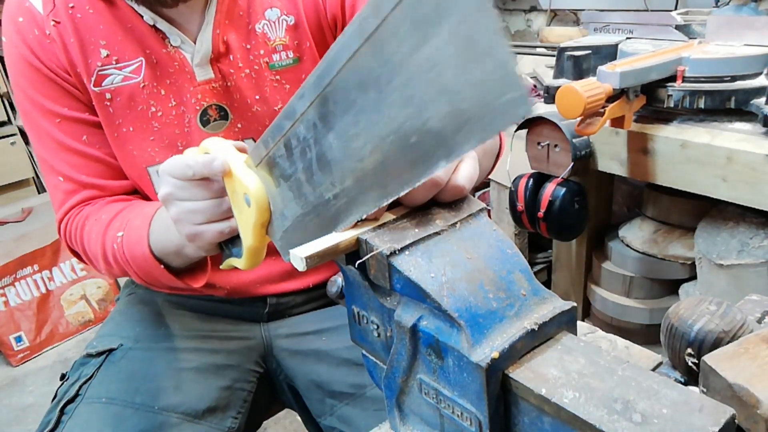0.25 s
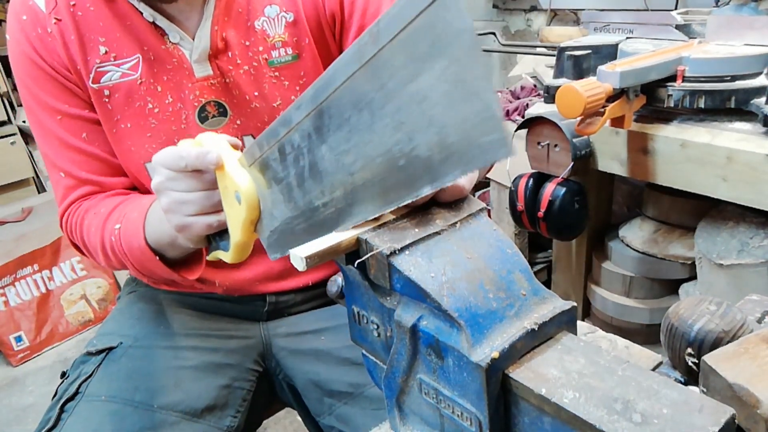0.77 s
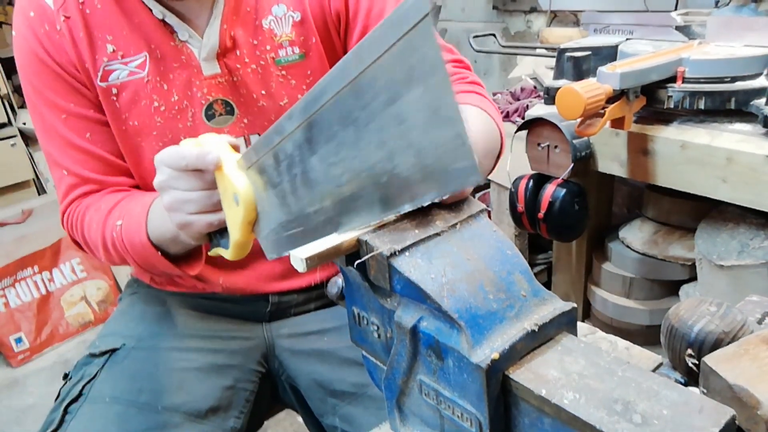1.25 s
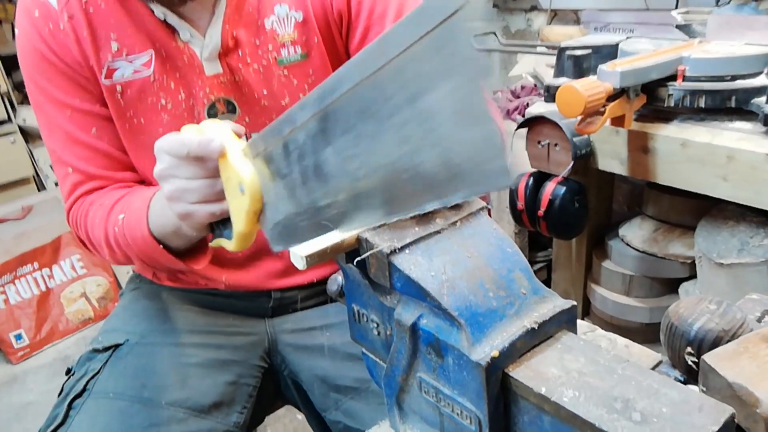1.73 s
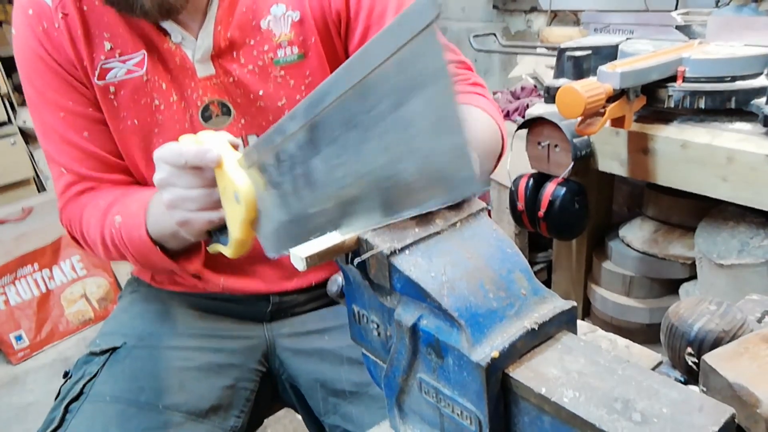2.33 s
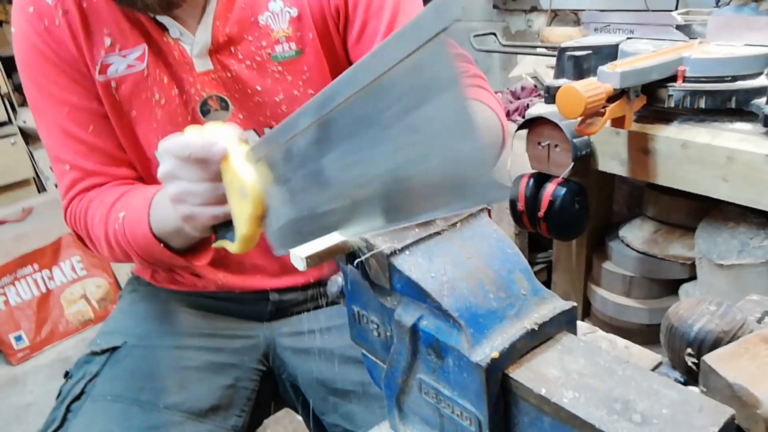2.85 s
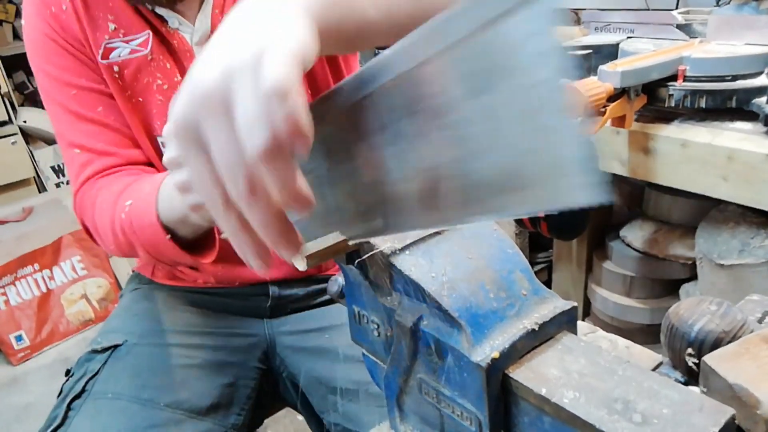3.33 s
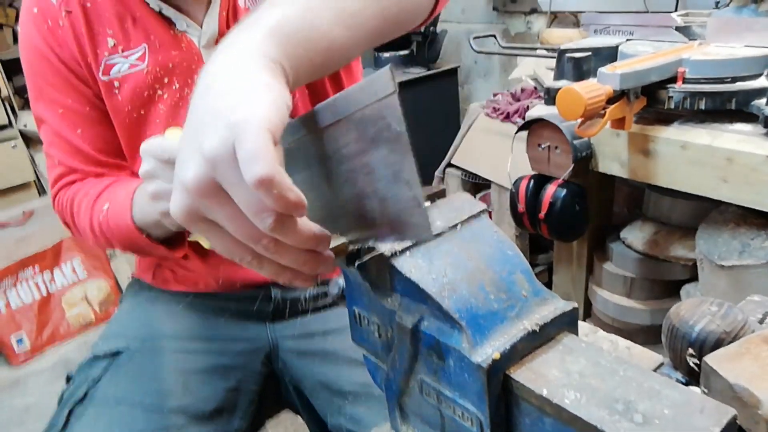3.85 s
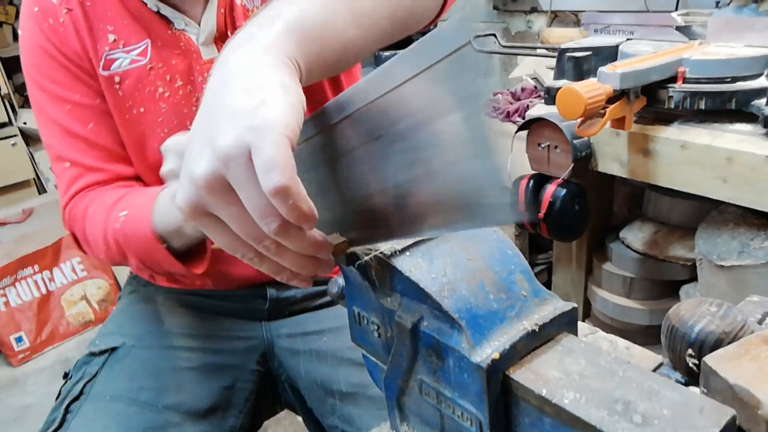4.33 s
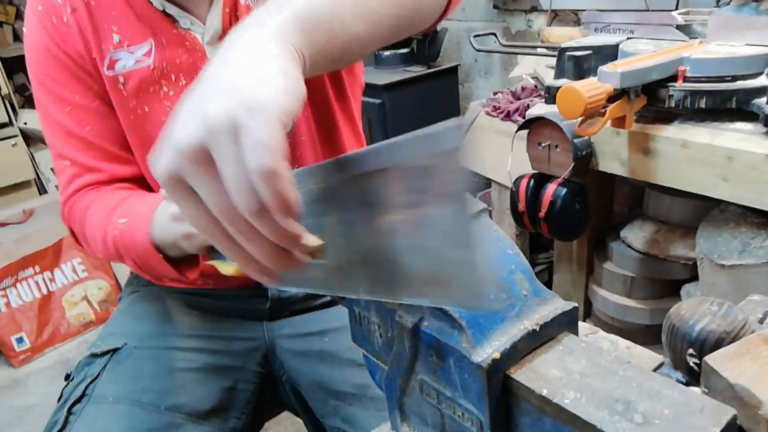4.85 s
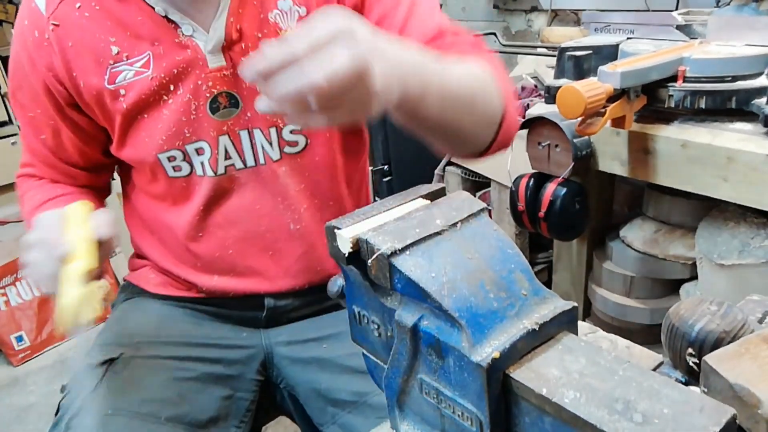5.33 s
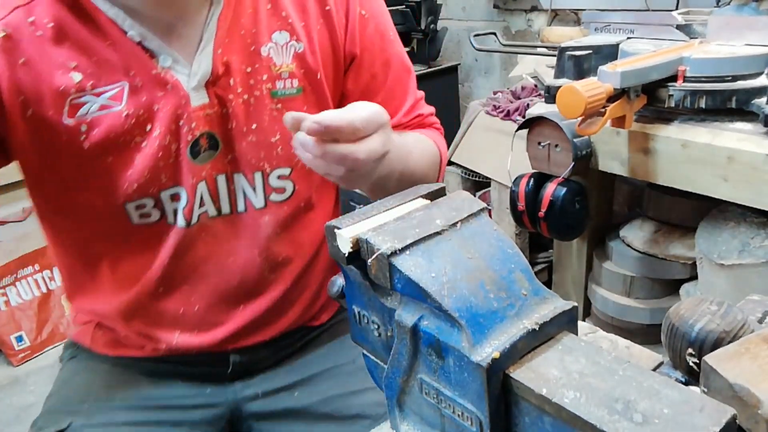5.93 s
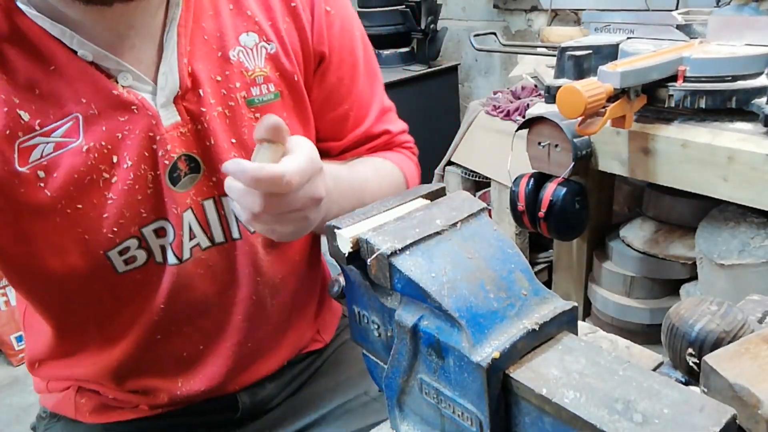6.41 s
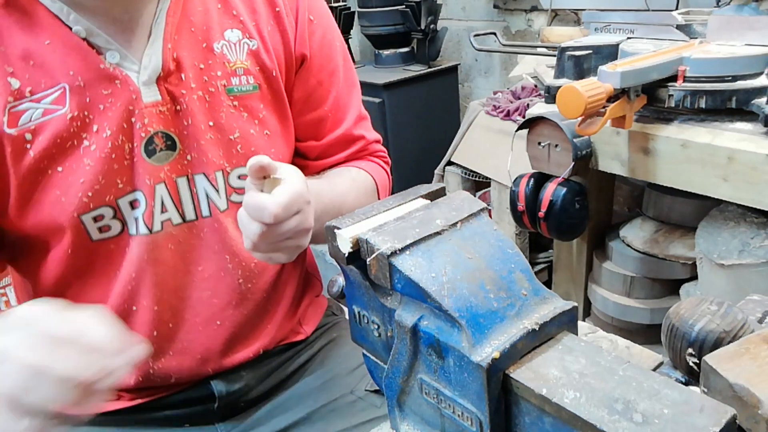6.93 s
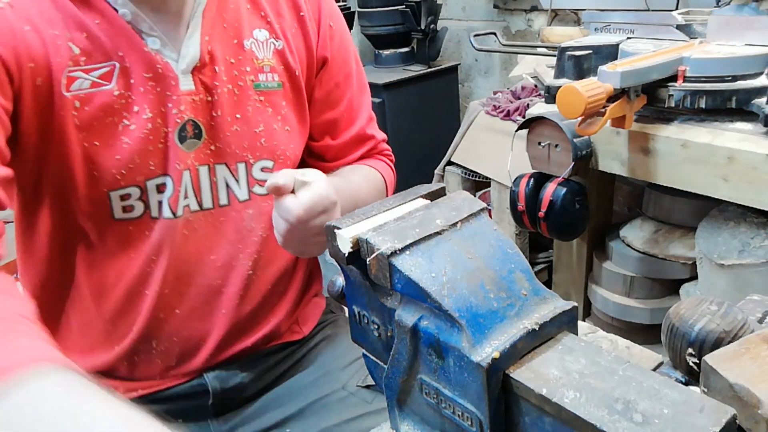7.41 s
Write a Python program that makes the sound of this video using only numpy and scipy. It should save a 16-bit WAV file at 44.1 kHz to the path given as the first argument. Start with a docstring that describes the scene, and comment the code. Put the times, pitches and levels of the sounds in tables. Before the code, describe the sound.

A close stereo microphone hears toothy, bright sawing of a dowel clamped in a vise, with low bench rumble underneath. Faint scratchy starter strokes give way to about five strokes a second, swelling mid-way, then duller as fingers hold the wood. A small crack ends the cut. About a second later the saw is put down in a cluster of clacks, soft heavy bumps and scrapes, in a short, small-room reverberation.

```python
"""A hand saw cuts through a wooden dowel in a bench vise: a few catching starter strokes, then steady sawing.
Each tooth tears a burst of noise, which rings the stub, the blade and the vise; the bench rumbles along.
The stub rings lower as the kerf deepens, until fingers damp it. It snaps off with a crack, and the saw
is put down with clacks, thuds and skids of filtered noise, in a small workshop with a quiet noise floor."""
import sys
import numpy as np
from scipy import signal
from scipy.fft import rfft, irfft, next_fast_len
from scipy.io import wavfile
from scipy.ndimage import uniform_filter1d

SR = 44100
rng = np.random.default_rng(int(sys.argv[2]) if len(sys.argv) > 2 else 0)


def store_wav(level_fs):
    """Save 16-bit WAV to argv[1]."""
    pcm = np.round(np.clip(np.atleast_2d(level_fs), -1, 1) * 32767)
    wavfile.write(sys.argv[1], SR, pcm.T.astype(np.int16))


N = 338247  # length in samples


def amp(db):
    """Decibels to gain."""
    return 10 ** (np.asarray(db) / 20)


def unit(x):
    """x at rms 1."""
    return x / np.sqrt(np.mean(x ** 2) + 1e-20)


def along(points, hz):
    """A table of frequency and value, read at hz on a log axis."""
    f, v = np.transpose(points)
    return np.interp(np.log(hz + 1), np.log(f + 1), v)


def curves(rows):
    """One value per sample for each column after the time."""
    seconds, *columns = np.transpose(rows)
    return [np.interp(np.arange(N) / SR, seconds, column) for column in columns]


def wobble(rate):
    """A random curve through rate knots a second."""
    knots = rng.standard_normal(int(N * rate / SR) + 2)
    return np.interp(np.arange(N) * rate / SR, np.arange(len(knots)), knots)


def filtered(x, response):
    """x times a response of frequency."""
    n = x.shape[-1]
    padded = next_fast_len(n + SR // 4)
    spectrum = rfft(x, padded) * response(np.fft.rfftfreq(padded, 1 / SR))
    return irfft(spectrum, padded)[..., :n]


def coloured(x, spectrum):
    """x shaped by the given spectrum, at rms 1."""
    return unit(filtered(x, lambda hz: amp(along(spectrum, hz))))


def resonance(f, hz, width, ring_db):
    """Response of a mode that lifts the frequencies near hz."""
    return 1 + (amp(ring_db) - 1) * 1j * f * width / (hz * hz - f * f + 1j * f * width)


def add(track, s, sound):
    """Mix a sound into the track at time s."""
    part = track[max(round(s * SR), 0):][:len(sound)]
    part += sound[:len(part)]


# Likeness of left and right. Each row: frequency in Hz, correlation from -1 to 1.
STEREO_LIKENESS = [(40, 0.93), (110, 0.78), (220, 0.75), (350, .55), (650, -0.055), (1300, 0.73),
                   (2500, 0.28), (4500, 0.0091), (6800, -0.3), (7900, 0.76), (8500, 0.78), (15000, 0.95)]


def stereo(pair, likeness=STEREO_LIKENESS):
    """Two unrelated signals become left and right, as alike in each band as the table says."""
    def mid_and_side_gain(hz):
        angle = np.arccos(np.clip(along(likeness, hz), -1, 1)) / 2
        return np.array([np.cos(angle), np.sin(angle)])

    mid, side = filtered(pair, mid_and_side_gain)
    return np.array([mid + side, mid - side])


def tearing(rate, scatter_db, life, grit_db):
    """Each tooth tears a short burst of fibres, of random size and slightly uneven timing; left and right."""
    teeth_passed = np.floor(np.cumsum(rate * amp(2.5 * wobble(250))) / SR)
    bite_size = amp(scatter_db * np.clip(rng.standard_normal(N), -2, 2))
    bites = (np.diff(teeth_passed, prepend=0) > 0) * bite_size
    tear = signal.lfilter([1], [1, -np.exp(-1 / (life * SR))], bites)
    # even out the level over 50 ms, so only the bursts remain
    tear /= np.sqrt(np.abs(uniform_filter1d(tear ** 2, SR // 20)) + 1e-6)
    fibres = np.tanh(rng.standard_normal((2, N)))  # a fibre can bear only so much before it breaks
    return unit(stereo((np.minimum(tear, 2.5) + amp(grit_db)) * fibres))


# Pace of the teeth at full blade speed: careful first strokes, then full ones.
# Each row: time in seconds, teeth a second.
TOOTH_PACE = [(.5, 198), (1.4, 410), (2.5, 680)]
# Colour of teeth tearing fibres. Each row: frequency in Hz, relative level in dB.
RASP_SPECTRUM = [(150, -6.5), (330, -3), (560, -9.5), (850, -5.5), (1200, -1), (1800, -2), (2600, -2.5),
                 (3600, 1), (6000, -1), (7200, 5.5), (8300, 6.5), (9700, 2.5), (11000, -7), (15800, -11.5)]
# Modes of the vise. Each row: frequency in Hz, width in Hz, ring in dB.
VISE_MODES = [(315, 14, 8.5), (391, 10, 10), (589, 23, 6.5)]
GRAIN_DB, GRAIN_RATE = 1.28, 42  # hard and soft grain in the wood: depth, and knots a second


def saw():
    """The teeth rasp through the kerf and ring the stub, the blade and the vise."""
    speed, strength, _, pushing = arm()
    pace, = curves(TOOTH_PACE)
    teeth = tearing(pace * (.4 + .6 * speed), scatter_db=2, life=0.00076, grit_db=0)
    grain_db = GRAIN_DB * wobble(GRAIN_RATE)
    judder_db = 2.1 * wobble(75) * np.sqrt(400 / pace)  # a slow blade judders more
    teeth = teeth * amp(grain_db + judder_db)

    hz, t, z = signal.stft(teeth, SR, nperseg=1024)
    low_hz, high_hz, stub_db, blade_hz, blade_db = kerf(t, strength, pushing)
    f = hz[:, None]
    vise = np.prod([resonance(f, *mode) for mode in VISE_MODES], axis=0)
    stub_low = resonance(f, low_hz, 98, 1.37 * stub_db - 0.5)
    stub_high = resonance(f, high_hz, 87.06, 1.51 * stub_db)
    blade = resonance(f, blade_hz, 830, blade_db)
    body = amp(along(RASP_SPECTRUM, f)) * vise * stub_low * stub_high * blade

    # the contact slides along the blade and wakes ever different plate modes
    streaks = rng.standard_normal(body.shape)
    streaks = uniform_filter1d(streaks, 4, 0)
    streaks = unit(uniform_filter1d(streaks, 5, 1))
    body = body * amp(1.7 * streaks)
    # the stroke's energy is shared out between rasp and ringing
    body /= np.sqrt(np.mean(np.abs(body) ** 2, axis=0))
    rasp = signal.istft(z * body, SR, nperseg=1024)[1][:, :N]
    return amp(-1.11) * strength * unit(rasp)


# Saw strokes. Each row: start in seconds, length in seconds, relative rasp level in dB at full speed,
# bench rumble in dB at full speed, direction (1 push, 0 pull).
SAW_STROKES = [(0.0, 0.13, -40.5, -52, 0), (0.249, 0.3, -45, -43.5, 1), (0.548, 0.11, -47.5, -51, 0),
               (0.809, 0.11, -42, -43, 0), (0.917, 0.21, -36, -44.5, 1), (1.155, 0.16, -34.5, -44, 0),
               (1.324, 0.19, -30, -46, 1), (1.524, .183, -35, -42, 0), (1.704, 0.19, -31, -46, 1),
               (1.912, 0.18, -36, -42.5, 0), (2.084, 0.19, -27.5, -42, 1), (2.279, 0.16, -28, -42, 0),
               (2.442, .197, -22.5, -44, 1), (2.638, 0.17, -27, -41.5, 0), (2.798, .19, -20, -40, 1),
               (2.991, 0.17, -24, -42.5, 0), (3.158, .192, -19.5, -41, 1), (3.354, 0.18, -25.5, -43.5, 0),
               (3.531, .2, -21.5, -39, 1), (3.736, 0.18, -25.5, -41, 0), (3.907, 0.2, -24, -41.5, 1),
               (4.102, 0.18, -27, -41.5, 0), (4.262, 0.19, -25, -42.5, 1), (4.457, 0.18, -27.5, -44, 0),
               (4.622, 0.19, -25, -43.5, 1)]
# seconds for the arm to gather speed and to slow to the turn
PUSH_RUN_UP_S, PULL_RUN_UP_S, SLOW_DOWN_S = .088, .066, .072
JERK_RUN_UP_S, STARTING_UNTIL_S = .03, 1.05  # before there is a kerf the blade jerks into motion
TURN_DIP_DB, BENCH_DIP_DB = 21.5, 6.5  # how much quieter the rasp and the rumble are at a turn


def arm():
    """Blade speed (0-1), cutting strength, bench shaking and direction: strokes run up, hold and slow down."""
    t = np.arange(N) / SR
    speed, strength, shaking, pushing = np.zeros((4, N))
    for start, length, db, bench_db, push in SAW_STROKES:
        inside = (t >= start) & (t < start + length)
        run_up = PUSH_RUN_UP_S if push > .5 else PULL_RUN_UP_S
        if start < STARTING_UNTIL_S:
            run_up = JERK_RUN_UP_S
        rising = (t[inside] - start) / run_up
        falling = (start + length - t[inside]) / SLOW_DOWN_S
        speed[inside] = np.sin(np.pi / 2 * np.clip(np.minimum(rising, falling), 0, 1))
        strength[inside] = amp(db + TURN_DIP_DB * (speed[inside] - 1))
        shaking[inside] = amp(bench_db + BENCH_DIP_DB * (speed[inside] - 1))
        pushing[inside] = push > .5
    return speed, strength, shaking, pushing


BITE_POWER = 1.17  # a harder stroke cuts more than in proportion
STUB_LOW_HZ, STUB_LOW_DROP_HZ = 1473, 500  # the stub's low mode, and its fall until the fingers take hold
STUB_HIGH_HZ, STUB_HIGH_DROP_HZ = 2730, 1190  # the same for its high mode
# ring of the uncut dowel, and its gain as the neck thins; saw() scales both for each mode
STUB_RING, STUB_LOOSENS = 5, 9
STUB_FREE_DEPTH = .42  # past this share of the cut the stub rings no louder
# the blade's band is highest at this depth and sags either side
BLADE_HZ, BLADE_SAG_HZ, BLADE_SAG_DEPTH = 8810, 2000, 0.22
# its ring; more in a deep kerf, and more again on a push there
BLADE_RING_DB, BLADE_DEEP_DB, BLADE_PUSH_DB = 3.5, 3.5, 5.5
TOUCH_S, HOLD_S, GRIP_S = 3.63, 3.7, .1  # fingers brush the stub, begin to hold it, and take this long to close
# stub and blade as damped by the fingers
HELD_LOW_HZ, HELD_HIGH_HZ, HELD_STUB_RING, HELD_BLADE_HZ, HELD_BLADE_DB = 1250, 1960, 3, 8050, 2


def kerf(t, strength, pushing):
    """The kerf deepens with the work done: the stub rings lower and freer until fingers damp it and the blade."""
    clock = np.arange(N) / SR
    work = np.cumsum(strength ** BITE_POWER)
    depth = np.minimum(np.interp(t, clock, work) / np.interp(HOLD_S, clock, work), 1)
    low_hz = STUB_LOW_HZ - STUB_LOW_DROP_HZ * depth ** 2
    high_hz = STUB_HIGH_HZ - STUB_HIGH_DROP_HZ * depth
    stub_ring = STUB_RING + STUB_LOOSENS * np.sqrt(np.minimum(depth, STUB_FREE_DEPTH))
    blade_hz = BLADE_HZ - BLADE_SAG_HZ * (depth - BLADE_SAG_DEPTH) ** 2
    push_db = BLADE_PUSH_DB * np.interp(t, clock, pushing)
    blade_db = BLADE_RING_DB + np.sqrt(depth) * (BLADE_DEEP_DB + push_db)

    def held(free, damped, since):
        """From the free value to the damped one as the fingers close."""
        return free + (damped - free) * np.interp(t, [since, HOLD_S + GRIP_S], [0, 1])

    return (held(low_hz, HELD_LOW_HZ, HOLD_S), held(high_hz, HELD_HIGH_HZ, HOLD_S),
            held(stub_ring, HELD_STUB_RING, TOUCH_S),
            held(blade_hz, HELD_BLADE_HZ, HOLD_S), held(blade_db, HELD_BLADE_DB, HOLD_S))


# Colour of a tick or click. Each row: frequency in Hz, relative level in dB.
CLICK_SPECTRUM = [(200, -24.5), (700, -11.5), (1500, -5), (5500, -4), (8500, 7.5), (10500, -9),
                  (16000, -19)]
# Teeth catching in the wood. Each row: time in seconds, relative level in dB.
TOOTH_CATCHES = [(0.0194, -30.5), (0.2573, -33), (0.3676, -28.5), (0.392, -27.5), (0.4135, -23.5),
                 (0.5631, -33), (0.8295, -29.5), (0.9408, -24.5), (1.0071, -17.5), (1.1892, -25.5),
                 (1.9375, -26), (2.0911, -32), (2.1241, -25), (3.1687, -22), (3.5414, -26), (4.6528, -20.5)]
CATCH_DB, CATCH_T60_S = -7.5, .028  # trim on every tick, and its decay


def catches():
    """A tooth hangs in the wood and breaks free with a sharp tick."""
    track, t = np.zeros(N), np.arange(SR // 20) / SR
    for s, db in TOOTH_CATCHES:
        tick = coloured(rng.standard_normal(len(t)), CLICK_SPECTRUM)
        add(track, s, amp(db + CATCH_DB - 60 * t / CATCH_T60_S) * tick)
    return track


SNAP_S, SNAP_HZ, SNAP_WIDTH_HZ = 4.894, 1700, 950  # when the stub breaks off, its ring and the ring's width
SNAP_CLICK_DB, SNAP_RING_DB, SNAP_THUD_DB = -39, -31.5, -51.5
SNAP_VISE_HZ, SNAP_VISE_DB, SNAP_VISE_T60_S = 400, -50, .3  # the vise rings on after it


def snap():
    """The last fibres break with a crack, and the freed vise rings."""
    track, t = np.zeros(N), np.arange(SR // 2) / SR
    add(track, SNAP_S, contact(SNAP_CLICK_DB, SNAP_HZ, SNAP_WIDTH_HZ, SNAP_RING_DB, SNAP_THUD_DB))
    vise = amp(SNAP_VISE_DB - 60 * t / SNAP_VISE_T60_S) * np.sin(2 * np.pi * SNAP_VISE_HZ * t)
    add(track, SNAP_S, vise)
    return track


# Jolts: the blade jams, the stub breaks, the saw lands. Each row: time in seconds, level in dB.
BENCH_JOLTS = [(.122, -38), (.497, -41), (4.894, -43), (5.945, -44)]
# Modes of the bench. Each row: frequency in Hz, width in Hz, ring in dB.
BENCH_MODES = [(79.2, 10.3, 8), (97.7, 6.5, 6), (137.9, 8, 9), (161, 12, 6)]
# Colour of the rumble. Each row: frequency in Hz, relative level in dB.
RUMBLE_SPECTRUM = [(20, -6.5), (45, 2.5), (60, -3.5), (80, 1), (110, 0), (150, -2), (195, -1), (275, -21),
                   (330, -5), (450, -30), (700, -49.5), (1500, -89.5)]
JOLT_T60_S, BENCH_T60_S = .06, 0.35  # how fast a jolt and the bench's rumble die


def bench():
    """Strokes and jolts shake the vise, and the bench under it rumbles in lumps at its own modes."""
    _, _, shaking, _ = arm()
    t = np.arange(SR // 2) / SR
    for s, db in BENCH_JOLTS:
        add(shaking, s, amp(db - 60 * t / JOLT_T60_S))
    dying = amp(-60 * t / BENCH_T60_S) ** 2  # decay of energy
    energy = signal.oaconvolve(shaking ** 2, dying / dying.sum())[:N]
    lumps = amp(2.85 * wobble(45)) * rng.standard_normal(N)
    frame = filtered(lumps, lambda f: np.prod([resonance(f, *mode) for mode in BENCH_MODES], axis=0))
    return np.sqrt(np.abs(energy)) * coloured(frame, RUMBLE_SPECTRUM)


# Hard contacts of wood and steel. Each row: time in seconds, relative click level in dB,
# ring frequency in Hz, relative ring level in dB.
HARD_CLACKS = [(.780, -54, 1500, -49), (1.158, -51, 1685, -44), (4.871, -55, 3420, -45.5),
               (5.306, -56.5, 8000, -48.5), (5.329, -52, 2800, -55), (5.943, -47.5, 1960, -41),
               (6.019, -32.5, 3120, -32), (6.364, -47.5, 1800, -32), (7.219, -48.5, 3860, -44)]
# Soft, heavy contacts: most as the saw is put down, the last a low rustle as an arm reaches over. Each row:
# time in seconds, relative thud level in dB.
SOFT_BUMPS = [(6.074, -29.5), (6.246, -32), (6.378, -32.5), (6.449, -42), (6.502, -50), (6.749, -57),
              (6.815, -59.5), (7.367, -52)]
CLACK_WIDTH_HZ = 620  # width of the ring: the wider, the shorter
# thud relative to the ring of a clack of this pitch; higher clacks are lighter contacts
CLACK_THUD_DB, LIGHTER_DB_PER_OCTAVE, CLACK_HZ = -12, 15, 1680
BUMP_CLICK_DB, BUMP_RING_DB, BUMP_HZ, BUMP_WIDTH_HZ = -11, -5, 810, 600  # click and ring relative to the thud


def knocks():
    """Clacks are mostly ring and click, bumps mostly thud."""
    track = np.zeros(N)
    for s, click_db, hz, ring_db in HARD_CLACKS:
        thud_db = ring_db + CLACK_THUD_DB - LIGHTER_DB_PER_OCTAVE * np.log2(hz / CLACK_HZ)
        add(track, s, contact(click_db, hz, CLACK_WIDTH_HZ, ring_db, thud_db))
    for s, db in SOFT_BUMPS:
        add(track, s, contact(db + BUMP_CLICK_DB, BUMP_HZ, BUMP_WIDTH_HZ, db + BUMP_RING_DB, db))
    return track


# Colour of a thud. Each row: frequency in Hz, relative level in dB.
THUD_SPECTRUM = [(25, -26), (60, -12), (100, -1.5), (160, -2.5), (240, 2), (330, -3.5), (450, -6),
                 (700, -21), (1500, -37), (4000, -90)]


def contact(click_db, hz, width, ring_db, thud_db):
    """A click, a short ring of the struck part and a thud of what lies under it."""
    t = np.arange(SR // 4) / SR
    click_noise, ring_noise, thud_noise = rng.standard_normal((3, len(t)))
    click_decay = amp(-60 * t / 0.0227) + amp(-6.5 - 60 * t / 0.31)  # a sharp start and a longer tail
    click = coloured(click_noise, CLICK_SPECTRUM) * click_decay
    ring = unit(filtered(ring_noise, lambda f: 1 / (1 + ((f - hz) / width) ** 2)))
    ring = ring * amp(-60 * t * width / 30)
    thud = coloured(thud_noise, THUD_SPECTRUM) * amp(-60 * t / 0.14)
    return amp(click_db) * click + amp(ring_db) * ring + amp(thud_db) * thud


# The saw skids after landing. Each row: time of the peak in seconds, relative level in dB.
SKIDS = [(6.101, -39), (6.255, -43.5), (6.354, -30)]
# Colour of the skids. Each row: frequency in Hz, relative level in dB.
SKID_SPECTRUM = [(40, -6.5), (250, -3), (470, -4.5), (620, -9.5), (1000, -9.5), (1400, -7), (2400, -12),
                 (5200, -16), (8400, -14), (10500, -26.5), (15800, -37.5)]
SKID_RISE_DB_PER_S, SKID_FALL_DB_PER_S = 650, 239
# light rubbing between the skids; its level is relative, like theirs
DRAG_FROM_S, DRAG_TO_S, DRAG_DB, DRAG_FADE_DB_PER_S = 5.945, 6.39, -51, 117


def slide():
    """The saw drags and skids over its resting place until it lies still."""
    t = np.arange(N) / SR
    level = (t > DRAG_FROM_S) * amp(DRAG_DB - DRAG_FADE_DB_PER_S * np.maximum(t - DRAG_TO_S, 0))
    for s, db in SKIDS:
        drop_db = np.maximum(SKID_RISE_DB_PER_S * (s - t), SKID_FALL_DB_PER_S * (t - s))
        level = np.maximum(level, amp(db - drop_db))
    rubbing = tearing(np.full(N, 190.), scatter_db=2.0, life=0.0014, grit_db=-11)
    return amp(-1.9) * level * coloured(rubbing, SKID_SPECTRUM)


# Decay of the workshop. Each row: frequency in Hz, time to fall by 60 dB in seconds.
ROOM_DECAY = [(100, 0.54), (400, 0.27), (1500, 0.24), (8000, 0.17), (15000, 0.13)]


def workshop(x, wet_db, early_db, early_t60):
    """The direct sound, dense reflections from bench and shelves, and a short tail."""
    hz, t, z = signal.stft(rng.standard_normal((2, SR // 3)), SR, nperseg=256)
    decay = amp(-60 * t / along(ROOM_DECAY, hz)[:, None])
    tail = signal.istft(z * decay, SR, nperseg=256)[1]
    t = np.arange(tail.shape[1]) / SR
    early = rng.standard_normal(tail.shape) * amp(-60 * t / early_t60)
    tail = amp(wet_db) * tail / np.linalg.norm(tail[0])
    early = amp(early_db) * early / np.linalg.norm(early[0])
    answer = stereo(tail + early)
    answer[:, 0] += 1  # the direct sound
    return signal.oaconvolve(x, answer / np.linalg.norm(answer[0]), axes=1)[:, :N]


# Colour of the quiet room. Each row: frequency in Hz, relative level in dB.
FLOOR_SPECTRUM = [(20, -4), (50, -6), (100, -4.5), (180, -16), (320, -16.5), (550, -23), (1300, -13),
                  (2200, -19), (5500, -24), (8300, -19.5), (11000, -31.5), (15800, -35)]
# Likeness of left and right in it. Each row: frequency in Hz, correlation from -1 to 1.
FLOOR_LIKENESS = [(60, 0.94), (200, 0.65), (600, 0.18), (8000, 0.22)]


def quiet_room():
    """Steady, faint coloured noise, wide above the bass."""
    noise = stereo(rng.standard_normal((2, N)), FLOOR_LIKENESS)
    return amp(-68.5) * coloured(noise, FLOOR_SPECTRUM)


# Place of the sawing between the speakers. Each row: frequency in Hz, left minus right in dB.
SAW_BALANCE = [(300, 0.4), (1200, 0.6), (2500, -1.3), (5000, -1), (9000, -3), (14000, -1)]


def scene():
    """Sawing with its treble a little to the right, clatter a little to the left, over the quiet room."""
    cutting = workshop(saw() + catches() + snap(), wet_db=-5.5, early_db=-5, early_t60=0.045)
    cutting = filtered(cutting, lambda hz: amp(0.42 + np.outer([.5, -.5], along(SAW_BALANCE, hz))))
    clatter = workshop(knocks() + slide(), wet_db=-0.5, early_db=0, early_t60=0.041)
    clatter = clatter * amp([[1.6], [.8]])  # left and right gain in dB
    return cutting + clatter + bench() + quiet_room()


def record(dry):
    """Nothing is kept above the band limit of 15.9 kHz."""
    return filtered(dry, lambda hz: hz < 15900)


dry = scene()
out = record(dry)
store_wav(out)
```